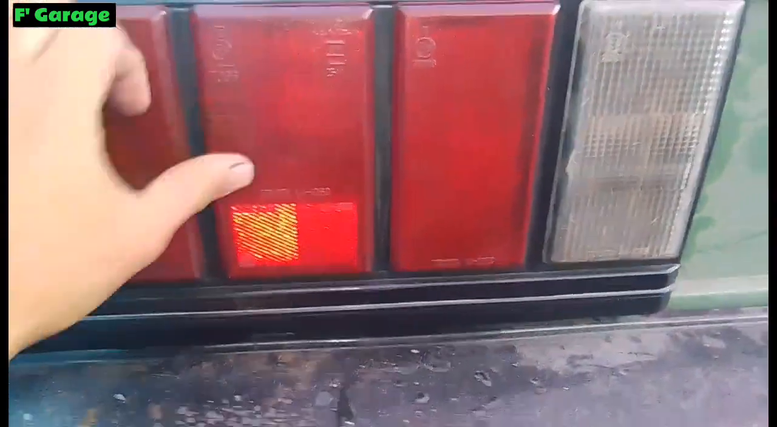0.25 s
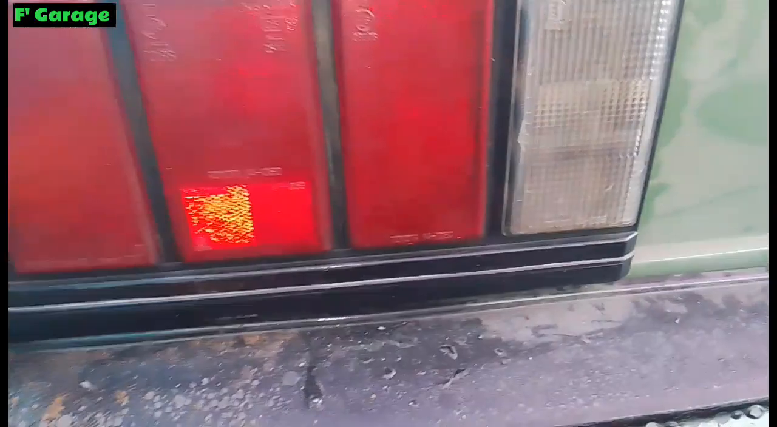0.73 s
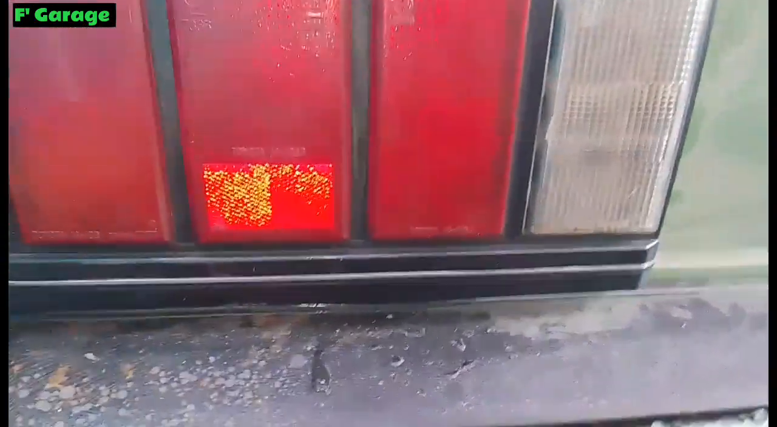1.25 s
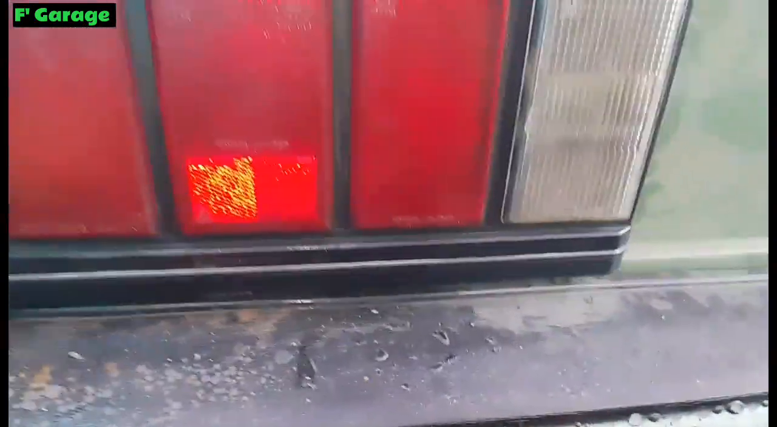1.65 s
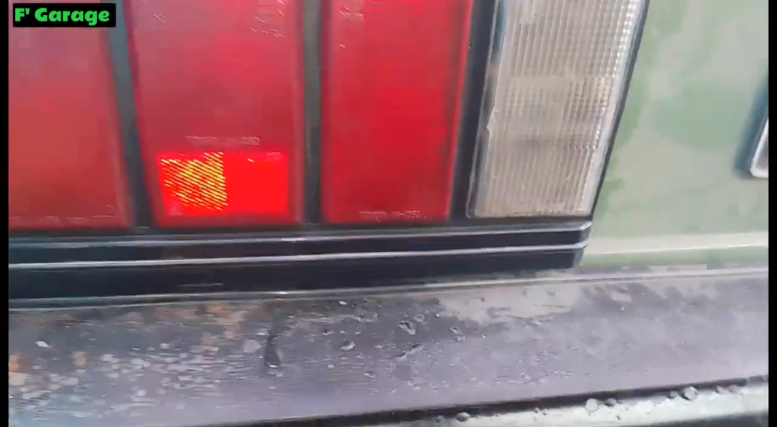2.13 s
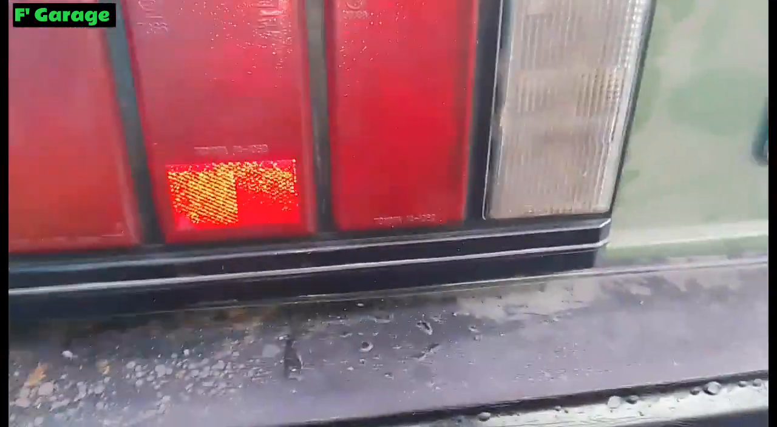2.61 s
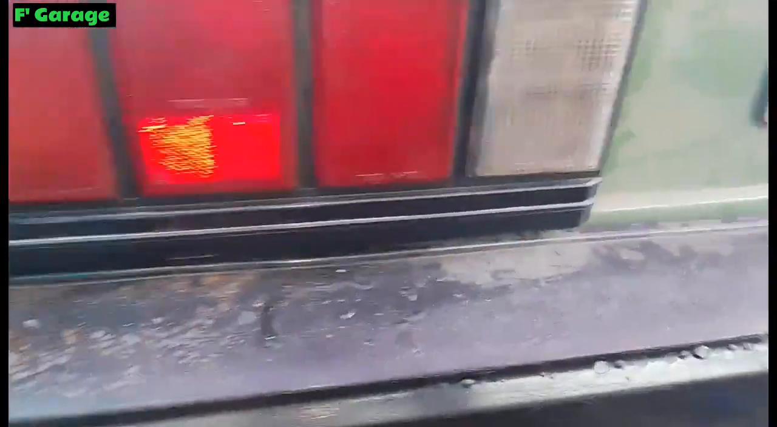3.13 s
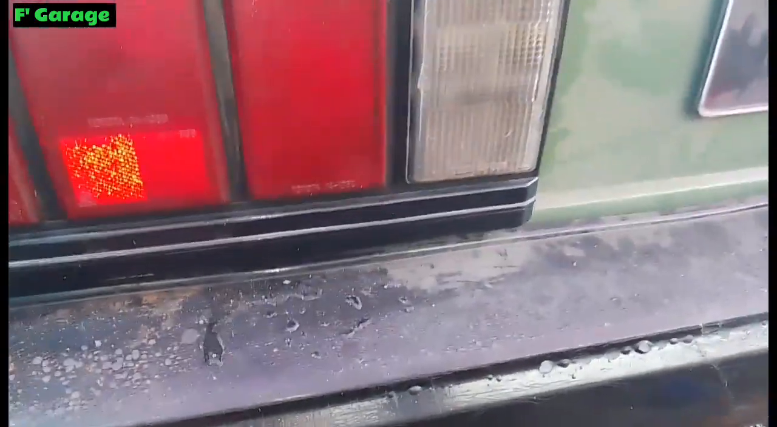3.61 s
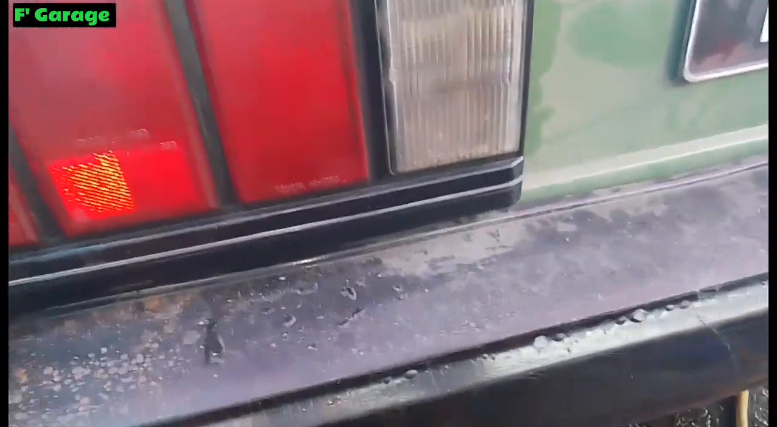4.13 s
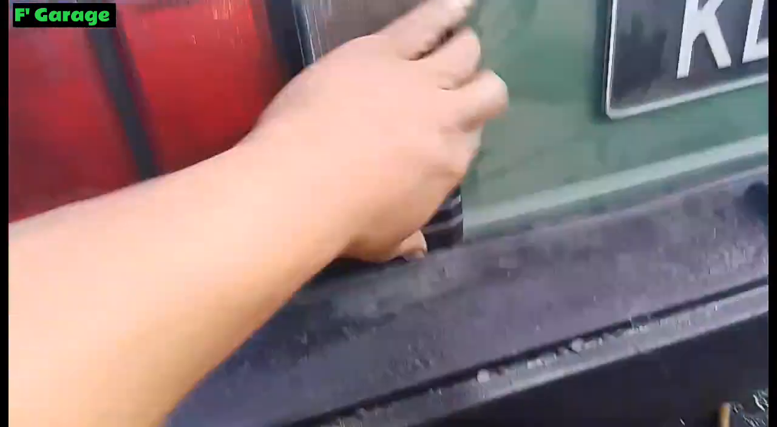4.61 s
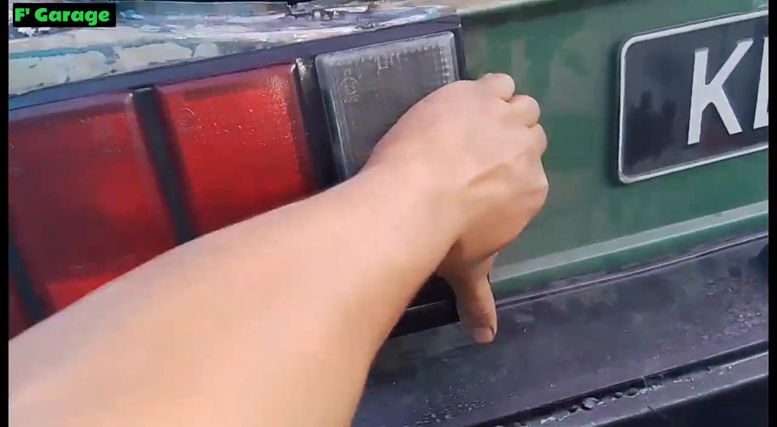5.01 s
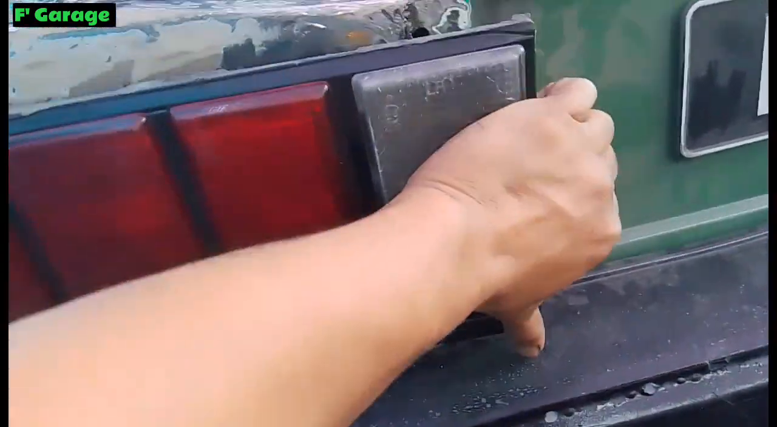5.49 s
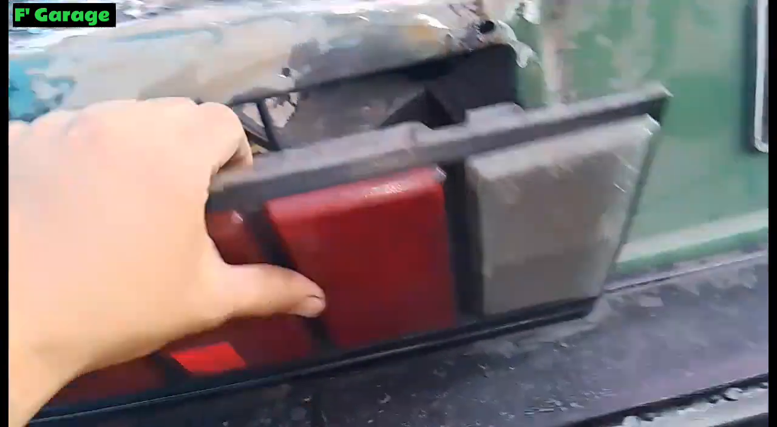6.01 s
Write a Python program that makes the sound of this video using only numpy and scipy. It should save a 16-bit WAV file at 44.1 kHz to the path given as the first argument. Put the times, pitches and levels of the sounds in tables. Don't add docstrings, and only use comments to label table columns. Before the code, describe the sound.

Close to a phone, a loose plastic tail-light housing is handled on a car's metal panel. A low rumble, faint machine hum and fluttering hiss run throughout. At about 0.3 s there are a few small ticks, then near quiet with tiny touches and a soft slide. A hard clack with quick chatter lands near 1.1 s, another at 1.6 s. From 2.2 to 2.9 s the rattling becomes dense, with bright cracks and dull knocks, loudest around 2.4 s. More clatter follows from 3.1 to 3.6 s. After a lull, a knock comes at 4.3 s, soft sliding around 4.9 s, then heavy slams from 5.0 to 5.3 s, flattened by the phone's limiter, and a smaller rattle near 5.5 s. Each hit leaves a short hollow panel ring. Only faint fingertip taps and shifting plastic remain until about 6.2 s.

```python
import sys
import numpy as np
from scipy import signal
from scipy.fft import rfft, irfft
from scipy.io import wavfile
from scipy.ndimage import uniform_filter1d, minimum_filter1d

SR = 44100
rng = np.random.default_rng(int(sys.argv[2]) if len(sys.argv) > 2 else 0)


def level_to_linear(level):
    exponent = np.asarray(level, float) / 20
    return 10 ** exponent


def to_wav(sig):
    pcm = np.clip(np.atleast_2d(sig), -1, 1) * 32767
    pcm = np.round(pcm).astype(np.int16)
    wavfile.write(sys.argv[1], SR, pcm.T)


N = 275832

# pitch [Hz], level [dB per Hz].
RUMBLE_COLOUR = [(21, -38), (35, -2), (80, 2), (103, 2), (162, 1), (200, -8), (250, -12.5), (320, -39),
                 (550, -120)]
# start [s], peak level [dB].
HAND_JOLTS = [(1.074, -26), (1.216, -37), (1.587, -26), (1.815, -29.5), (2.089, -38), (2.217, -26.5),
              (2.382, -19.5), (2.529, -26.5), (2.699, -33), (2.757, -21), (2.889, -31), (3.104, -28),
              (3.214, -29), (3.269, -34), (3.405, -25.5), (3.554, -18), (4.309, -33), (4.716, -41),
              (4.975, -27), (5.224, -22), (5.479, -30.5), (5.899, -39)]
# pitch [Hz], level [dB rms].
HUM_TONES = [(53.8, -58.5), (72, -55), (108, -68.5), (145.3, -60.5)]
# pitch [Hz], level [dB per Hz].
HISS_COLOUR = [(120, -37), (200, 4), (448, -4.5), (623, -4.5), (986, -6.5), (1180, -12.5), (1980, -2.5),
               (2750, -15), (4680, -6.5), (5940, -7), (8900, -28.5), (14700, -36), (16200, -70)]
# start [s], length [s], level [dB].
SLIDES = [(0.612, 0.12, -48.5), (1.35, 0.21, -43.5), (1.57, 0.0097, -13), (2.078, 0.049, -45),
          (3.97, 0.094, -43.5), (4.797, 0.065, -44.5), (4.208, 0.032, -53), (4.437, 0.044, -59),
          (4.923, 0.15, -34.5), (5.68, 0.035, -51), (5.75, 0.3, -52)]
# pitch [Hz], level [dB per Hz].
SLIDE_COLOUR = [(300, 0), (2000, 5), (3200, -4), (5000, 5.5), (6700, 0), (8800, -20.5), (15000, -22)]
# centre [Hz], level [dB], time to fall 60 dB [s].
AFTER_RING = [(147, 2, 0.33), (329, 2, 0.4), (743, 5.5, 0.18), (1274, 1, 0.24), (2005, -6.5, 0.22),
              (3360, 0.5, 0.24), (4300, -7.5, 0.21), (7400, -7, 0.27), (11300, 1, 0.094)]
# pitch [Hz], gain [dB], time to fall 60 dB [s].
SHEET_MODES = [(148, -23, 0.19), (273, -22, 0.97), (341, -17, 0.38), (470, -14, 0.32), (625, -13.5, 0.51),
               (1025, -9, 0.12), (1535, -12, 0.22), (1843, -21, 0.28), (1990, -38, 0.3)]
# pitch [Hz], level [dB], time to fall 60 dB [s].
BODY_MODES = [(158.6, -3, 0.25), (199, -8, 0.12), (278, -6, 0.17), (338.6, 2, 0.09), (394.6, -5.5, 0.039),
              (464, -4, 0.071), (586, -1, 0.091), (653, -3.5, 0.12), (721.3, -1.5, 0.081), (858, 2, 0.077),
              (955, 0.5, 0.045), (1131, 1, 0.022)]
# pitch [Hz], level [dB], time to fall 60 dB [s].
LENS_MODES = [(1300, -13.5, 0.049), (1544, -3.5, 0.023), (1689, -6.5, 0.051), (1881, -3.5, 0.049),
              (1950, -2.5, 0.073), (2086, 3.5, 0.022), (2285, -9, 0.062), (2433, -17.5, 0.15),
              (2824, -16.5, 0.032)]
# pitch [Hz], level [dB per Hz].
TICK_COLOUR = [(2600, -7), (3600, -6.5), (4700, 1.5), (5200, 0.5), (5700, -2.5), (6700, -6), (8400, -18),
               (12000, -25.5), (15000, -31)]
# start [s], lens peak [dB], main body tone [Hz], chatter length [s], body above lens [dB].
SLAMS = [(1.0721, -2, 470, 0.015, -8.5), (1.5791, -5.5, 400, 0.023, -3.5), (2.404, 1, 730, .013, -7),
         (2.7352, -7.5, 567, 0.0083, -6.5), (2.8327, -3.5, 780, 0.02, -6.5), (3.0897, -11, 781, 0.0039, -2),
         (3.459, -3, 706, 0.016, -9), (3.546, -3.5, 456, 0.024, -8.5), (4.3113, -8.5, 420, 0.017, -5.5),
         (4.9756, -12.5, 745, 0.012, -3), (5.0517, -4.5, 600, 0.0015, 2),
         (5.2642, -0.5, 1020, 0.0067, -6.5), (5.456, -17.5, 862, 0.021, 2)]
# start [s], lens peak [dB], main body tone [Hz], body above lens [dB].
CRACKS = [(0.2707, -19, 320, -11), (0.3067, -21.5, 600, -6), (1.06, -11, 240, -10), (1.084, -6, 990, -12),
          (1.5859, -5.5, 1050, -11), (1.5983, -8.5, 316, 1), (2.395, 6, 289, -12.5),
          (2.4324, -5.5, 597, -5), (2.5452, -12, 385, -7.5), (2.7309, -3.5, 791, 3),
          (2.756, -7.5, 762, 1.5), (2.828, -13, 920, 4), (2.8761, -15.5, 340, -1.5),
          (3.0991, -10, 351, -13), (3.2028, -18.5, 241, -3), (3.221, -16.5, 195, -11),
          (3.264, -14, 572, -7.5), (3.4017, -12, 780, -6.5), (3.414, -13.5, 321, -3), (3.5383, -6, 910, -7),
          (3.558, -3.5, 1075, -2.5), (4.2718, -26.5, 300, -1.5), (4.3017, -10, 339, -6),
          (4.338, -14, 402, -2), (5.2162, -0.5, 688, 4.5), (5.25, 0, 666, -10), (5.2725, -7, 268, -.6),
          (5.488, -15.5, 354, -4), (3.2125, -19.5, 234, -2.5), (2.7105, -31, 920, -12)]
# start [s], lens peak [dB], main body tone [Hz], tick above lens [dB].
KNOCKS = [(0.283, -25, 490, -1.5), (1.0539, -15.5, 940, 0), (1.0663, -5.5, 430, -1),
          (1.194, -26.5, 880, -1), (1.261, -30, 1007, -2), (1.548, -20, 586, 0.5),
          (1.8265, -22.5, 240, -6.5), (2.2024, -21, 366, -8), (2.225, -24, 347, -7),
          (2.3431, -21, 320, -10), (2.3687, -21.5, 322, -8), (2.3807, -13, 444, -4),
          (2.4595, -19, 1000, -14), (2.5017, -12.5, 390, -2.5), (2.5157, -16.5, 600, -4),
          (2.702, -12.5, 842, -3.5), (2.844, -7.5, 356, 1), (3.1129, -9.5, 400, -0.5),
          (3.228, -13.5, 319, -2.5), (3.246, -17.5, 500, -4.5), (3.426, -12, 325, -1),
          (3.4326, -14.5, 256, -1), (3.4513, -10, 433, -2), (3.5085, -17.5, 320, 0), (3.594, -19, 645, -10),
          (4.321, -10.5, 348.4, -20), (4.9864, -11.5, 868, -11), (5.057, -12, 620, -1.5),
          (5.228, 6.5, 692, -2), (5.237, -3.5, 740, -2)]
# start [s], lens peak [dB], main body tone [Hz], tick above lens [dB].
TOUCHES = [(0.3133, -32.5, 644, -14), (.345, -44, 255, 9), (0.6332, -41, 210, -7), (.871, -45.5, 312, 8.5),
           (1.019, -45, 194, 1), (1.1442, -39, 259, -3), (2.092, -30.5, 357, -3), (2.3356, -38, 477, -5),
           (2.6585, -31.5, 437, -23), (2.7994, -47, 613, 3), (3.386, -25.5, 367, 1),
           (3.747, -40.5, 251, -37), (3.9789, -40.5, 440, -5), (4.009, -59, 840, 8), (4.169, -51, 247, 11),
           (4.2503, -25.5, 244, -7.5), (4.816, -42, 1010, -2), (5.5242, -29.5, 258, 1.5),
           (5.7496, -30, 600, -6), (5.7666, -30.5, 770, -7), (5.788, -39, 794, -5), (5.808, -40.5, 329, -4),
           (5.852, -33, 345, -1.5), (5.8638, -41, 600, -19), (5.892, -40, 266, -16),
           (5.944, -39.5, 756, -13), (6.037, -38.5, 794, -3), (6.205, -47, 390, 0)]

SPAN = 8192


def shaped(colour, size):
    hz, db = np.transpose(colour)
    f = np.fft.rfftfreq(size, 1 / SR) + 1
    gain_db = np.interp(np.log(f), np.log(hz), db, left=-60, right=-90)
    x = irfft(rfft(rng.standard_normal(size)) * level_to_linear(gain_db), size)
    return x / np.std(x)


def fade(t60, size):
    return np.exp(-np.log(1000) * np.arange(size) / SR / np.asarray(t60)[..., None])


def walk(rate):
    hold = int(SR / rate)
    steps = np.repeat(rng.standard_normal(N // hold + 1), hold)
    return uniform_filter1d(uniform_filter1d(steps, hold), hold)[:N]


def lingering(x, rise_s, fall_s):
    a, b = np.exp(-1 / (rise_s * SR)), np.exp(-1 / (fall_s * SR))
    return np.abs(signal.lfilter([(1 - a) * (1 - b)], np.convolve([1, -a], [1, -b]), x ** 2))


def rumble():
    quiet_db, jolt_db = -53, -4
    rise_s, fall_s = 0.013, 0.027
    s, db = np.transpose(HAND_JOLTS)
    kicks = np.zeros(N)
    kicks[(s * SR).astype(int)] = level_to_linear(db + jolt_db) * np.sqrt(SR * (rise_s + fall_s))
    shake = np.sqrt(level_to_linear(2 * quiet_db) + lingering(kicks, rise_s, fall_s))
    return shaped(RUMBLE_COLOUR, N) * shake * level_to_linear(1.9 * walk(19))


def machine_cycle():
    sway_hz = 23.5
    return np.cumsum(sway_hz * (1 + 0.03 * walk(4.1))) / SR


def machine(cycle):
    sway_db = -47.5
    out = level_to_linear(sway_db + 2.7 * walk(3.02)) * np.sin(2 * np.pi * cycle)
    for hz, db in HUM_TONES:
        level = level_to_linear(db + 2.5 + 1.9 * walk(3.06))
        turns = np.cumsum(hz * (1 + 0.0207 * walk(3.7))) / SR
        out += level * np.sin(2 * np.pi * turns)
    return out


def hiss(blows, cycle):
    quiet_db, stir_db = -50, -23.5
    throb_db, puff_share = 6, 0.29
    stirred = lingering(np.tanh(blows), rise_s=0.0057, fall_s=0.047)
    stir = np.sqrt(level_to_linear(2 * quiet_db) + level_to_linear(2 * stir_db) * stirred)
    puffs = uniform_filter1d(np.exp(-(cycle % 1) / puff_share), size=350)
    wander_db = 2.0 * walk(48) + 0.15 * walk(2.7)
    return shaped(HISS_COLOUR, N) * stir * level_to_linear(throb_db * puffs + wander_db)


def slides():
    swells = np.zeros(N)
    grains = shaped(SLIDE_COLOUR, N) * level_to_linear(3.1 * walk(400))
    t = np.arange(N) / SR
    for s, length, db in SLIDES:
        half = length / 2
        swells += level_to_linear(db) * np.exp(-((t - s - half) / half) ** 2 * 2)
    return swells * grains


def panel(blows):
    ring_db, rise_s = -9, 0.00077
    centres = np.log(np.array(AFTER_RING)[:, 0])
    f = np.log(np.fft.rfftfreq(N, 1 / SR) + 1)
    spectrum = rfft(blows)
    noise = rfft(rng.standard_normal(N)) * uniform_filter1d(np.abs(spectrum), size=1500)
    rise = np.exp(-1 / (rise_s * SR))
    out = 0
    for k, (hz, db, t60) in enumerate(AFTER_RING):
        slope = np.interp(f, centres, np.arange(len(AFTER_RING)) == k)
        share = np.sqrt(slope) * (np.abs(f - np.log(hz)) < 0.5)
        keep = fade(t60 / 2, 2)[1]
        energy = irfft(spectrum * share, N) ** 2
        stored = signal.lfilter([(1 - keep) * (1 - rise)], np.convolve([1, -keep], [1, -rise]), energy)
        hush = irfft(noise * share, N)
        out = out + level_to_linear(ring_db + db) * np.sqrt(np.abs(stored)) * hush / np.std(hush)
    return out


def sheet(blows):
    out = 0
    for hz, db, t60 in SHEET_MODES:
        keep = fade(t60, 2)[1]
        ringing = signal.lfilter([1], [1, -keep * np.exp(2j * np.pi * hz / SR)], blows).imag
        out = out + level_to_linear(db + 17.0) * (1 - keep) * ringing
    return out


def struck(modes, spread_db=5.5, detune=0.0374, count=2):
    hz, db, t60 = np.repeat(np.transpose(modes), count, axis=1)
    chance = rng.standard_normal((2, len(hz)))
    turns = np.outer(hz * (1 + detune * chance[0]), np.arange(SPAN)) / SR
    sign = (-1) ** (np.arange(len(hz)) // count)
    tones = np.sin(2 * np.pi * turns) * fade(t60, SPAN)
    return (sign * level_to_linear(db + spread_db * chance[1])) @ tones


def body(hz):
    focus_db = -5.5
    near = [(f, db + focus_db * abs(np.log2(f / hz)), t60) for f, db, t60 in BODY_MODES]
    main = [(hz, 3, min(45 / hz, 0.13))]
    return struck(near) + struck(main, spread_db=2.5, detune=0.011)


def edge_tick(hardness_db):
    air_hz, air_per_db = 8000, 0.31
    air_db = air_per_db * np.clip(hardness_db, -30, 0)
    colour = [(hz, db + (hz > air_hz) * air_db) for hz, db in TICK_COLOUR]
    rise_s = 0.0002
    burst = fade(0.06, SPAN) + level_to_linear(6.5) * fade(0.013, SPAN)
    rise = (1 - np.exp(-np.arange(SPAN) / (rise_s * SR))) ** 2
    return shaped(colour, SPAN) * burst * rise


def chatter(length):
    rebounds_hz, level_db, scatter_db = 600, -7, 3.5
    gaps, sizes, signs = rng.exponential(size=64), rng.standard_normal(64), rng.choice([-1, 1], 64)
    t = np.cumsum(gaps) / rebounds_hz
    strength = level_to_linear(level_db + scatter_db * sizes) * np.exp(-(t / max(length, 1e-3)) ** 2)
    push = np.zeros(SPAN)
    np.add.at(push, np.minimum((t * SR).astype(int), SPAN - 1), signs * strength)
    push[0] = 1
    return push


def contacts():
    rows = []
    for s, db, hz, length, body_db in SLAMS:
        rows.append((s, db, body_db, hz, 3.5, length))
        rows.append((s + 0.026, -17 + 0.27 * db, -2, 400, -13, 0.009))
    for s, db, hz, body_db in CRACKS:
        rows.append((s, db, body_db, hz, 4, 0.0056))
    for s, db, hz, tick_db in KNOCKS:
        rows.append((s, db, -4, hz, tick_db, 0.011))
    for s, db, hz, tick_db in TOUCHES:
        rows.append((s, db, 3.5, hz, tick_db, 0.008))
    return rows


def housing():
    out = np.zeros(N + SPAN)
    contact_s = 0.00013
    contact = np.exp(-(np.arange(-32, 33) / (SR * contact_s / 4)) ** 2)
    for s, lens_db, body_db, body_hz, tick_db, length in contacts():
        push = chatter(length)
        body_ring = np.convolve(body(body_hz), contact, "same")
        lens_ring = np.convolve(struck(LENS_MODES), contact, "same")
        tick = edge_tick(lens_db + tick_db)
        for part, db in ((body_ring, body_db), (lens_ring, 0), (tick, tick_db)):
            sound = signal.fftconvolve(push, part)[:SPAN]
            out[int(s * SR):][:SPAN] += level_to_linear(lens_db + db + 1.0) * sound / np.abs(sound).max()
    return out[:N]


def scene():
    blows = housing()
    cycle = machine_cycle()
    background = rumble() + machine(cycle) + hiss(blows, cycle)
    return (background + slides() + panel(blows) + sheet(blows) + blows)[None]


def low_pass(x):
    return signal.sosfilt(signal.butter(12, 16480, fs=SR, output="sos"), x)


def record(dry):
    ceiling, grip_samples = 0.77, 5
    top_hz, offset = 15300, 0.0047
    room_left = np.minimum(1, ceiling / (np.abs(dry) + 1e-9))
    gain = uniform_filter1d(minimum_filter1d(room_left, size=2 * grip_samples), size=grip_samples)
    top = signal.cheby1(8, 0.3, top_hz, fs=SR, output="sos")
    mix = signal.sosfilt(top, gain * dry) + offset
    return low_pass(mix)


dry = scene()
out = record(dry)
to_wav(out)
```